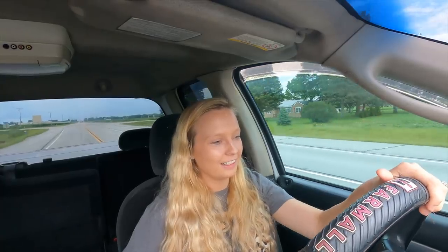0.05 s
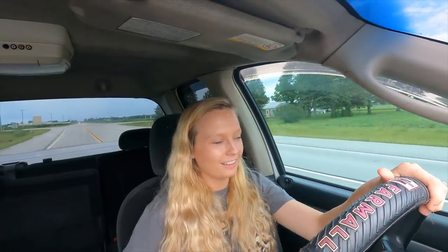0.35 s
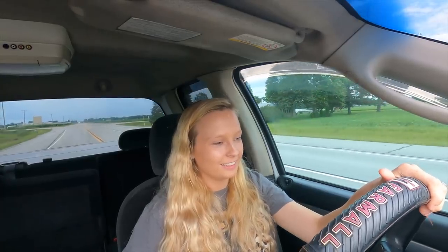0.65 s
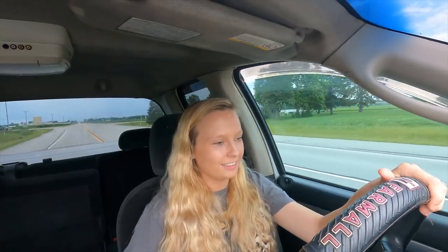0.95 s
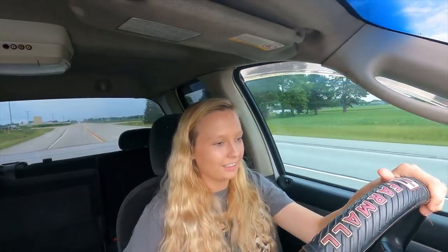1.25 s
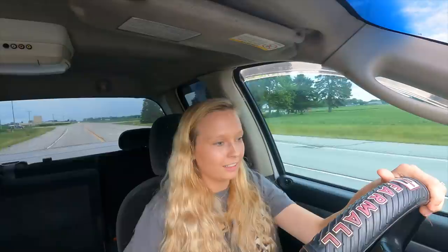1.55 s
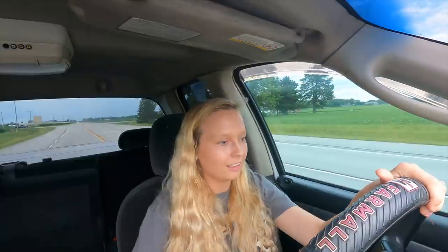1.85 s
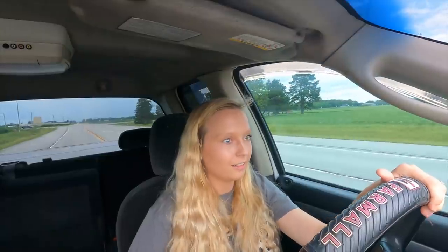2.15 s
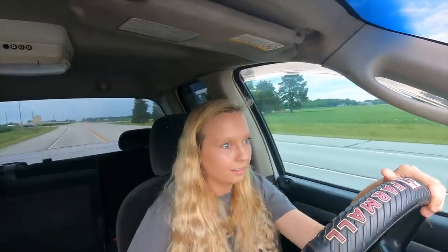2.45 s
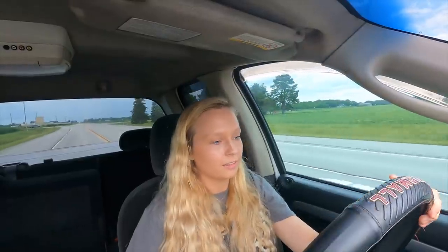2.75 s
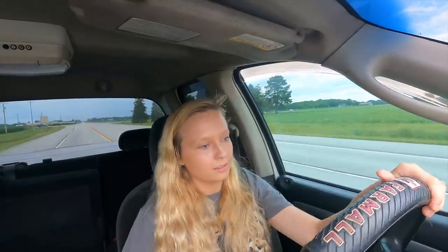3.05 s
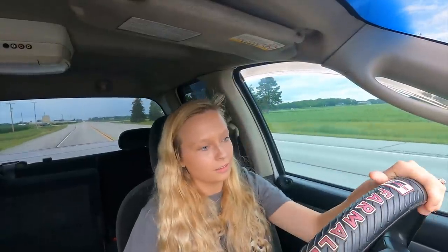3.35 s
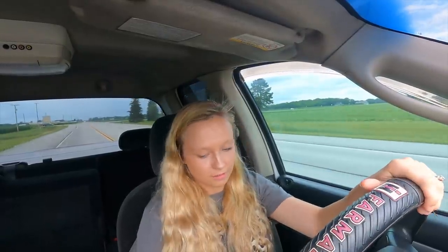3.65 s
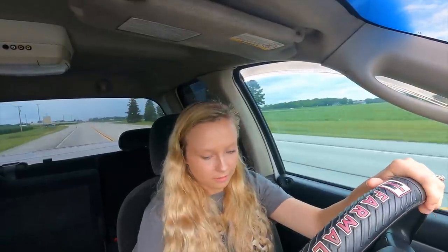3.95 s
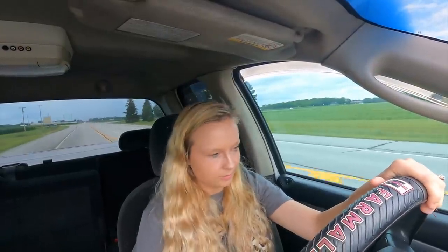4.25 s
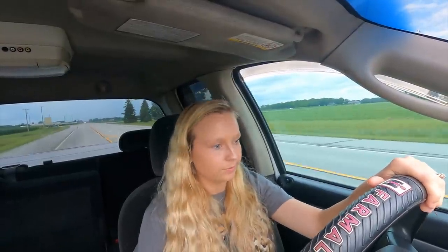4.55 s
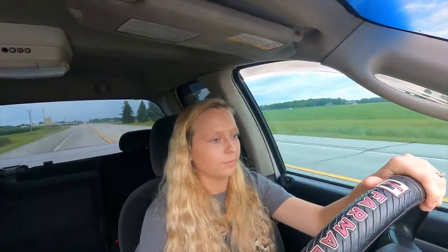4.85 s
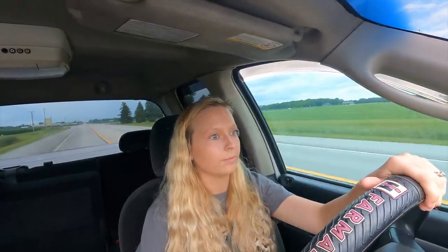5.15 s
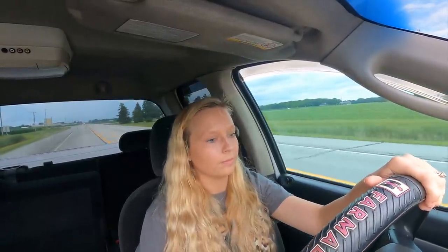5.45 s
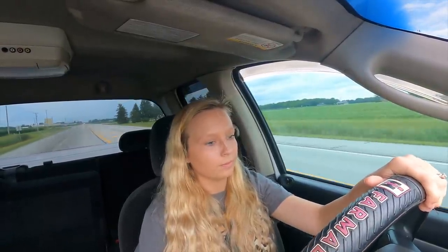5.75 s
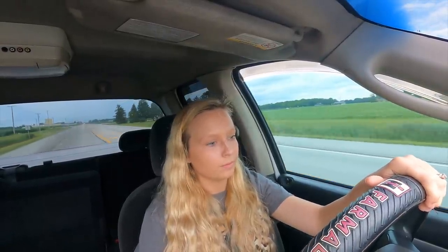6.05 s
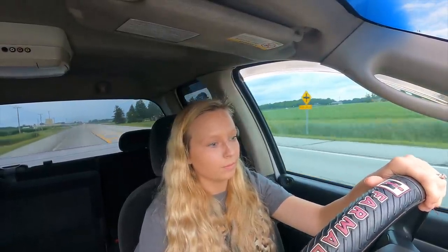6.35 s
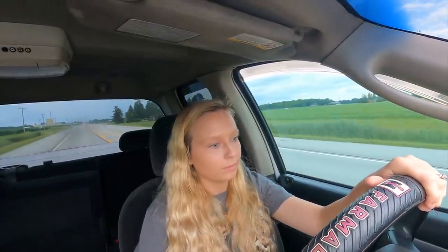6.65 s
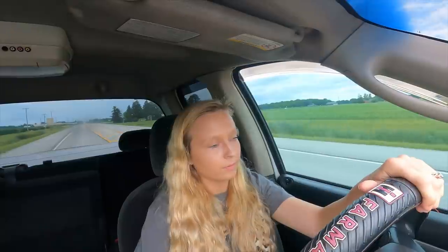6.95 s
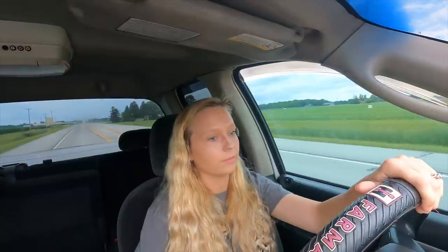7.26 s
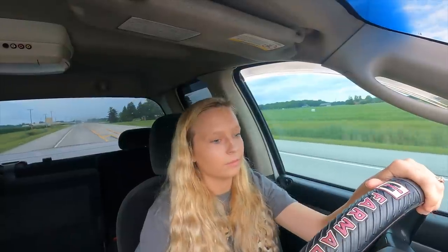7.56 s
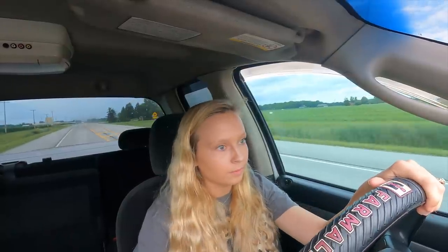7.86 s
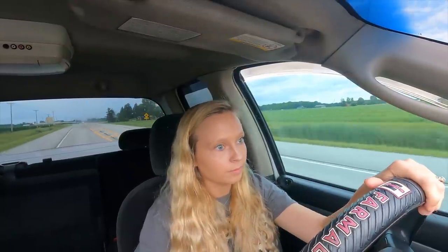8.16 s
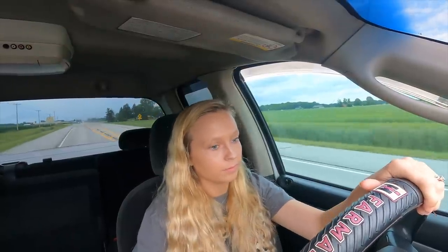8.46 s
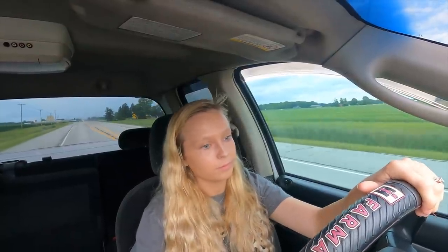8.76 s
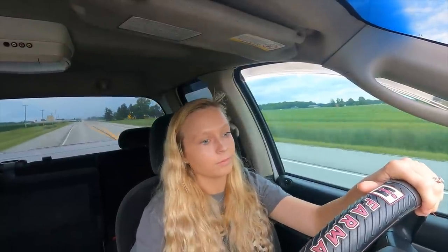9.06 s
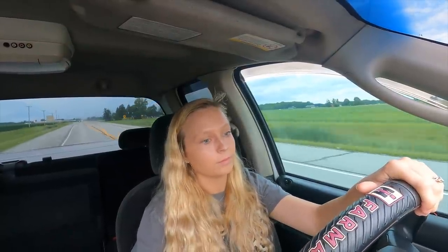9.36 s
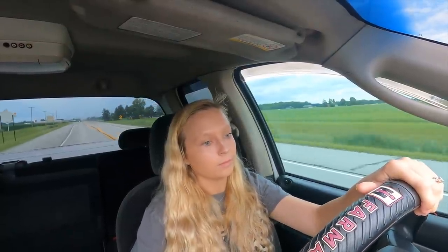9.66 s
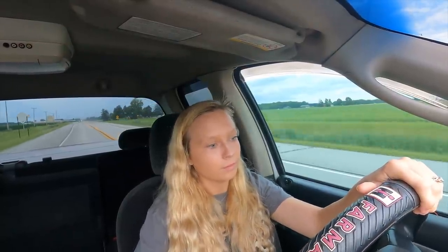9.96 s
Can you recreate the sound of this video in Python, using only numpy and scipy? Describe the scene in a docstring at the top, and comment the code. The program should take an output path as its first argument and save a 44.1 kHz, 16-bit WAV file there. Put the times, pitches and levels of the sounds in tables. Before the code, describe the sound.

Inside a truck cab, a diesel engine drones and pulls through two gear changes, with road rumble, a faint whistle and plastic trim snaps.

```python
"""Inside the cab of a six-cylinder diesel pickup that pulls away through two upshifts.
The periodic firing of the cylinders drives the cab's resonances, so its note booms; unequal cylinders
shake the cab when the engine lugs after a shift. Combustion clatters through the bulkhead, the turbo
whistles faintly over its intake hiss, tyres rumble, and plastic trim snaps and squeaks now and then."""
import sys
import numpy as np
from scipy import signal
from scipy.fft import rfft, irfft
from scipy.io import wavfile
from scipy.ndimage import uniform_filter1d

SR = 44100
rng = np.random.default_rng(int(sys.argv[2]) if len(sys.argv) > 2 else 0)


def file_out(sig):
    """Save sig as 16-bit WAV at sys.argv[1]."""
    # one column per channel
    cols = np.atleast_2d(sig).T
    # limit, then scale
    lim = np.clip(cols, -1, 1)
    pcm = np.round(lim * 32767).astype(np.int16)
    wavfile.write(sys.argv[1], SR, pcm)


N = 441000
TIME = np.arange(N) / SR
BINS = np.fft.rfftfreq(N, 1 / SR)
CYLINDERS, EDGE_HZ = 6, 15700
BOOM_HZ, BOOM_WIDTH_HZ, BOOM_DB = 126, 26.4, -12  # the cab's boom


def amp(db):
    """Decibels to amplitude ratio."""
    return 10 ** (np.asarray(db) / 20)


def unit(x):
    """Normalisation to an rms of one."""
    return x / np.sqrt(np.mean(x ** 2) + 1e-20)


def curves(rows):
    """Linear interpolation of each column of a time table."""
    times, *columns = np.transpose(rows)
    return [np.interp(TIME, times, column) for column in columns]


def spectrum(points):
    """Linear interpolation on a log-frequency axis."""
    hz, value = np.transpose(points)
    return np.interp(np.log(BINS + 1), np.log(hz), value)


def wander(rate_hz):
    """Random modulation of rms one, low-passed at about the given rate."""
    coarse = np.linspace(0, TIME[-1], 4000)
    hz = np.fft.rfftfreq(len(coarse), coarse[1])
    slow = irfft(rfft(rng.standard_normal(len(coarse))) * np.exp(-(hz / rate_hz) ** 2))
    return np.interp(TIME, coarse, unit(slow))


def step(x):
    """Logistic rise from 0 to 1 as x passes zero."""
    return .5 + .5 * np.tanh(x / 2)


def resonance(hz, centre_hz, width_hz):
    """Lorentzian curve: one at the centre, a half at the edges of the width."""
    return 1 / (1 + ((hz - centre_hz) / (width_hz / 2)) ** 2)


def pan(left_db):
    """Level panning: gains that set the left channel this far above the right."""
    return amp(np.array([[left_db], [-left_db]]) / 2)


# Likeness of left and right: (frequency [Hz], correlation [0-1])
COHERENCE = [(30, 1), (70, .98), (130, .95), (250, .72), (500, .84), (1000, .82), (2000, .42), (4000, .66),
             (8000, .64), (14000, .56)]
def noise(colour):
    """Partial coherence: coloured stereo noise, alike in the bass and looser in the treble."""
    mid, side = rfft(rng.standard_normal((2, N)))
    alike = np.clip(spectrum(COHERENCE), 0, 1)
    mid, side = mid * np.sqrt(1 + alike), side * np.sqrt(1 - alike)
    return unit(irfft(np.array([mid + side, mid - side]) * amp(spectrum(colour)), N))


def reflections(x, echo_db, span_s):
    """Comb filtering: echoes from nearby glass and panels ripple the spectrum."""
    taps = np.zeros((2, 2048))
    delays = rng.integers(40, int(np.clip(span_s * SR, 100, 2000)), 24)
    taps[:, delays] = rng.standard_normal(len(delays)) + .5 * rng.standard_normal((2, len(delays)))
    taps *= amp(echo_db) / np.linalg.norm(taps, axis=1, keepdims=True)
    taps[:, 0] = 1  # direct sound
    return signal.oaconvolve(x, taps / np.linalg.norm(taps[0]), axes=1)[:, :N]


# Engine speed: (time [s], firing rate [Hz])
ENGINE_SPEED = [(0, 118.5), (0.5, 123.1), (1.0, 125.3), (1.5, 128.4), (1.98, 130.8), (2.12, 138),
                (2.39, 140.4), (2.56, 101), (3.5, 109.1), (5.0, 120.5), (6.0, 126), (7.08, 130.7),
                (7.28, 120.7), (7.95, 120.1), (8.08, 123.7), (8.3, 121.2), (9.0, 122.7), (10, 133)]
def firing_rate():
    """The engine's fundamental in Hz, one period to each firing."""
    return curves(ENGINE_SPEED)[0]


def lugging(below_hz=118.7, spread_hz=2.6):
    """Soft threshold: how much the engine labours at low speed, 0-1."""
    return step((below_hz - firing_rate()) / spread_hz)


# Upshifts: (start [s], length [s], dip of the firing note [dB], surge as the gear bites [dB],
# body shudder [dB])
UPSHIFTS = [(2.076, 0.45, -1, 0.3, -22.5), (7.5, 0.45, -3.5, 2, -37)]
def shifting(start, length, edge_s=0.035):
    """Smooth gate: one during a gear change, zero outside it."""
    return step((TIME - start) / edge_s) * step((start + length - TIME) / edge_s)


# The gears in turn: (rocking [dB], clatter [dB], second harmonic [dB], third harmonic [dB])
GEAR_LEVELS = [(-38.5, -43.5, 2, -4.5), (-31, -42.5, 0, 0.54), (-34.5, -41.5, -1, -1)]
def in_gear():
    """Crossfade of levels: each shift hands over to the next gear."""
    gear = sum(np.clip((TIME - start) / length, 0, 1) for start, length, *_ in UPSHIFTS)
    return [np.interp(gear, np.arange(len(column)), column) for column in np.transpose(GEAR_LEVELS)]


# Spectra of the tyres and of the body: (frequency [Hz], relative density [dB])
TYRE_SPECTRUM = [(20, -23), (45, -4.5), (70, 1.5), (95, -2.5), (130, 1), (180, 3), (240, -1), (300, -3),
                 (370, -3), (450, -7.5), (560, -10.5), (660, -10), (820, -21.5), (1400, -52), (8000, -100)]
BODY_SPECTRUM = [(10, -9.5), (25, -1), (42, 6.5), (60, -3), (85, -7.5), (130, -19), (300, -67.5),
                 (2000, -110)]
def road(rise_db_per_s=0.3727, shift_rumble_db=1):
    """Low-frequency noise: tyre rumble grows; in a shift the drive line and body shake harder."""
    rumble_db = -29.5 + rise_db_per_s * TIME
    tremble = amp(-33.5)
    for start, length, _, _, shudder_db in UPSHIFTS:
        rumble_db += shift_rumble_db * shifting(start, length)
        tremble = tremble + amp(shudder_db) * shifting(start, length)
    return amp(rumble_db) * noise(TYRE_SPECTRUM) + tremble * noise(BODY_SPECTRUM).mean(0)


# Blade tone of the turbo: (time [s], frequency [Hz])
BLADE_TONE = [(0, 7440), (1.1, 7550), (2.1, 7430), (2.45, 6720), (2.75, 6600), (3.3, 7330), (4, 8700),
              (4.7, 9440), (5.5, 9750), (6.5, 9080), (7.3, 8660), (7.75, 6800), (8.05, 6200), (8.35, 6700),
              (9.1, 8480), (10, 9970)]
def turbo_speed(middle_hz=8000):
    """Pitch follows rotor speed: the blade tone in Hz, and in octaves above its middle pitch."""
    whistle_hz, = curves(BLADE_TONE)
    return whistle_hz, np.log2(whistle_hz / middle_hz)


# Spectrum of the intake air: (frequency [Hz], relative density [dB])
INTAKE_SPECTRUM = [(100, -47), (1200, -25.5), (2500, 4), (3700, 0), (4700, 0.5), (6000, -3), (7700, -4.5),
                   (8200, -2), (9000, -1.5), (10600, -0.5), (11400, -7.5), (12600, -6), (14000, -18),
                   (16000, -29)]
# Swell of both hiss and clatter: (time [s], gain [dB])
ENGINE_SWELL = [(0, 2.5), (0.7, -1), (2.2, -0.6), (3.3, 1.3), (4.5, 2.2), (5.6, 0.2), (8.6, 0.26),
                (10, 0.5)]
def intake(db_per_octave=2.5, lug_db=1):
    """Broadband flow noise: the intake hiss grows and brightens as the turbo spins up."""
    swell_db, = curves(ENGINE_SWELL)
    _, octaves = turbo_speed()
    hiss_db = -48.5 + swell_db + db_per_octave * octaves + lug_db * lugging()
    hiss = noise(INTAKE_SPECTRUM)
    treble = irfft(rfft(hiss) / (1 + (7900 / (BINS + 1)) ** 24), N)
    opening = amp(-12 + 7.5 * octaves)
    return amp(hiss_db) * (hiss - treble + opening * treble) * pan(left_db=1.4)


def air_band(centre_hz, width_hz):
    """Quadrature modulation: a band of rushing air follows a moving pitch."""
    baseband = noise([(1, 0), (width_hz / 2, -2), (width_hz, -10),
                      (4 * width_hz, -42), (8 * width_hz, -90)])
    quadrature = np.roll(baseband, N // 2, axis=1)
    angle = 2 * np.pi * np.cumsum(centre_hz) / SR
    return baseband * np.cos(angle) + quadrature * np.sin(angle)


def turbo_rush(db_per_octave=-6, spool_db=3, spool_hz_per_s=1000, lug_db=4.5):
    """Narrowband flow noise just below the whistle, louder while the turbo gains or loses speed."""
    whistle_hz, octaves = turbo_speed()
    glide = uniform_filter1d(abs(np.gradient(whistle_hz, TIME)), size=SR // 4)
    spooling = np.tanh(glide / spool_hz_per_s)
    duct_db = 6 * resonance(whistle_hz, centre_hz=7880, width_hz=470)
    rush_db = -63.5 + db_per_octave * octaves + spool_db * spooling + lug_db * lugging() + duct_db
    upper = amp(-0.5) * air_band(whistle_hz - 60, width_hz=320)
    lower = amp(-5) * air_band(whistle_hz * .93, width_hz=580)
    rush = (upper + lower) * amp(rush_db + 2.2 * wander(rate_hz=41))
    return reflections(rush, echo_db=0.5, span_s=.015)


def turbo_whistle(cycles, db_per_octave=-5.5):
    """Blade tone, phase-modulated at half the firing rate and lifted at the intake duct's resonance."""
    whistle_hz, octaves = turbo_speed()
    duct_db = 8.5 * resonance(whistle_hz, centre_hz=7540, width_hz=90)
    sway = .6 * np.sin(np.pi * CYLINDERS * cycles)
    angle = 2 * np.pi * np.cumsum(whistle_hz + 3 * wander(rate_hz=10)) / SR + sway
    # the gliding tone crosses standing waves in the cab, differently on each side
    sides = [amp(3.5 * wander(rate_hz=10)) * np.sin(angle + .4 * wander(rate_hz=4)) for _ in range(2)]
    return np.sqrt(2) * amp(-64 + db_per_octave * octaves + duct_db) * np.array(sides)


# Spectrum of combustion knock: (frequency [Hz], relative density [dB])
KNOCK_SPECTRUM = [(300, -29), (600, -10), (950, 2.5), (1280, 1), (1480, -4.5), (1800, -2), (2200, -10),
                  (2700, -12), (3600, -18.5), (5000, -29), (10000, -51), (16000, -92.5)]
def clatter(cycles, db_per_octave=3, lug_db=0.2):
    """Amplitude-modulated noise: combustion knock swells with every firing, unevenly by cylinder."""
    _, gear_db, *_ = in_gear()
    swell_db, = curves(ENGINE_SWELL)
    _, turbo_octaves = turbo_speed()
    clatter_db = gear_db + swell_db + db_per_octave * turbo_octaves + lug_db * lugging()
    knocks = sum(np.cos(2 * np.pi * (k * cycles + rng.random())) for k in range(2, CYLINDERS + 1))
    envelope = amp(clatter_db + 0.16 * wander(rate_hz=46)) * unit(1 + 0.034 * knocks)
    return envelope * noise(KNOCK_SPECTRUM) * pan(left_db=1.4)


# Rubbing trim: (time [s], frequency [Hz], level [dB])
TRIM_RUBS = [(2.645, 5520, -53), (2.69, 5450, -57), (2.75, 5470, -57), (2.8, 5490, -53)]
def trim_squeaks(half_width_s=0.013):
    """Friction tones: panels rub for a moment as the lugging engine shakes them."""
    out = np.zeros(N)
    for time, hz, db in TRIM_RUBS:
        envelope = amp(db) * np.exp(-((TIME - time) / half_width_s) ** 2)
        out += envelope * np.sin(2 * np.pi * hz * TIME + 1.5 * wander(rate_hz=120))
    return np.sqrt(2) * out


# Modes of the trim: (base frequency [Hz], relative energy [dB], t60 [s])
PANEL_MODES = [(1055, -14, 0.032), (1250, 2, .03), (1703, 12.5, 0.06), (1890, 0, .035), (2174, 4, 0.027),
               (2520, -0.5, 0.039), (3560, 6, 0.0093), (4460, -5, 0.02), (5190, -3, 0.04), (6300, -4, 0.04),
               (7480, -20, 0.035), (9200, -21.5, 0.029), (10200, -14, .025)]
def panel_ring(t, pitch):
    """Impulse response of a panel: a sum of damped modes, scaled to unit energy."""
    ring = sum(amp(db - 60 * t / t60) * np.sin(2 * np.pi * hz * pitch * t) / np.sqrt(t60)
               for hz, db, t60 in PANEL_MODES if hz * pitch < EDGE_HZ)
    return ring / np.linalg.norm(ring)


# Spectrum of a snap: (frequency [Hz], relative density [dB])
SNAP_SPECTRUM = [(100, -50), (600, -16), (1200, -4), (2000, -6), (2800, -7), (5000, -3), (7000, -4),
                 (8800, -4), (9600, -10), (12000, -11), (14000, -22), (16000, -36)]
# Snaps of the trim: (time [s], level [dB], t60 [s], panel pitch [ratio], ring [dB], treble [dB])
SNAP_EVENTS = [(1.67, -33, 0.037, 0.93, -2, -9), (1.6722, -25, 0.069, 1, 0, -16),
               (1.719, -36.5, 0.089, 1, 3, -16), (1.7332, -27.5, 0.069, 0.98, 0, -21),
               (1.746, -34.5, .06, 1.3, 1.5, -18), (2.1536, -17, 0.045, 0.99, -6, -3.5),
               (2.16, -27.5, 0.091, 1.1, 2, -5), (6.8315, -37, 0.049, 1, -1, -7),
               (6.877, -21.5, 0.051, 0.96, -2.5, -2), (9.87, -32, 0.031, 2.85, -7, -2)]
def trim_snaps(rise_s=0.0003):
    """Transient excitation: stressed plastic lets go in gritty bursts that ring the panel."""
    t = TIME[:SR // 4]
    crack = noise(SNAP_SPECTRUM)
    treble = irfft(rfft(crack) / (1 + (8500 / (BINS + 1)) ** 6), N)
    grit = noise([(100, 0), (16000, 0)])
    crackle = amp(1.8 * wander(rate_hz=180))
    out = np.zeros((2, N))
    for time, db, t60, pitch, ring_db, treble_db in SNAP_EVENTS:
        span = slice(round(time * SR), round(time * SR) + len(t))
        age = t[:len(TIME[span])]
        envelope = amp(db - 60 * age / t60) * (1 - np.exp(-age / rise_s)) * crackle[span]
        ring = signal.fftconvolve(envelope * grit[:, span], panel_ring(t, pitch)[None], axes=1)
        burst = crack[:, span] + (amp(treble_db) - 1) * treble[:, span]
        out[:, span] += amp(-2) * envelope * burst + amp(ring_db) * ring[:, :len(age)]
    return out * pan(left_db=1)


# Orders of the uneven cylinders: (frequency [multiple of the cycle rate], level re shudder [dB])
LOPE_ORDERS = [(2, -19), (4, -0.5), (5, -11.5), (7, -9.5), (8, -10.5), (9, -6.5), (10, -14.5), (11, -22.5),
               (13, -25.5), (14, -25.5), (15, -17.5), (16, -20.5), (17, -24), (19, -24.5), (21, -26.5)]
def lope(cycles, firing_hz, rock_db_per_hz=0.74, lug_rock_db=15, lug_shudder_db=16):
    """Harmonics of the four-stroke cycle: unequal cylinders make the note throb, most when lugging."""
    gear_db, *_ = in_gear()
    rock_db = gear_db + lug_rock_db * lugging() + rock_db_per_hz * (firing_hz - BOOM_HZ)
    shudder_db = -39 + lug_shudder_db * lugging()
    angle = 2 * np.pi * cycles
    out = amp(rock_db + 1.7 * wander(rate_hz=14)) * np.sin(CYLINDERS / 2 * angle)  # half the firing rate
    for k, db in LOPE_ORDERS:
        level = amp(shudder_db + db + 0.91 * wander(rate_hz=3.3))
        out += level * np.sin(k * angle + 2 * np.pi * rng.random() + 0.42 * wander(rate_hz=4.4))
    return np.sqrt(2) * out


# Resonances of the cab: (frequency [Hz], width [Hz], level [dB])
CAB_MODES = [(215.2, 20, -26), (247.5, 10.2, -30), (267.7, 11, -27.5), (329.5, 16, -30), (354, 34.4, -29.5),
             (392.9, 8, -42.5), (458.6, 14, -32), (502, 12, -41.5), (568.5, 25, -41.5), (629.3, 38, -41.5),
             (720, 91, -49)]
def cab_gain(hz, base_db=-39):
    """Frequency response of the cab: its modes add in power over a falling base."""
    grid = np.geomspace(100, 2000, 1500)
    power = sum((amp(db) * resonance(grid, centre, width)) ** 2 for centre, width, db in CAB_MODES)
    base = amp(base_db) * (250 / grid) ** 2.28
    return np.interp(hz, grid, np.sqrt(power + base ** 2))


# How hard the engine pulls: (time [s], load [dB])
ENGINE_LOAD = [(0, 0.7), (0.5, 0.4), (1.6, -0.27), (3.5, -0.16), (5.2, 0.92), (6.4, -0.5), (7.1, -0.18),
               (8.6, -0.74), (10, 1.5)]
def firing(cycles, firing_hz, growl_per_load=2.3, bite_delay_s=0.135, bite_s=0.07):
    """Forced resonance: the firing note swells near the boom; its overtones sweep the cab's modes."""
    load_db, = curves(ENGINE_LOAD)
    _, _, second_db, third_db = in_gear()
    shift_db = np.zeros(N)
    for start, length, dip_db, surge_db, _ in UPSHIFTS:
        bite = np.exp(-((TIME - start - length - bite_delay_s) / bite_s) ** 2)
        shift_db += dip_db * shifting(start, length) + surge_db * bite
    boom = amp(BOOM_DB + load_db + shift_db) * np.sqrt(resonance(firing_hz, BOOM_HZ, BOOM_WIDTH_HZ))
    angle = 2 * np.pi * CYLINDERS * cycles
    note = boom * amp(0.11 * wander(rate_hz=84)) * np.sin(angle)
    sharpness = amp(growl_per_load * load_db + 1.1 * shift_db)  # load sharpens the exhaust pulses
    overtones = np.zeros(N)
    for k in range(2, 11):
        order_db = second_db * (k == 2) + third_db * (k == 3) - 2 * (k > 5)
        level = sharpness * cab_gain(k * firing_hz) * amp(order_db + 0.99 * wander(rate_hz=6.4))
        overtones += level * np.sin(k * angle + 2 * np.pi * rng.random() + 0.11 * wander(rate_hz=8.8))
    return np.sqrt(2) * (note * pan(left_db=-.2) + overtones)


def scene():
    """Superposition of the sources; one crankshaft keeps the engine's rhythms in step."""
    firing_hz = firing_rate()
    cycles = np.cumsum(firing_hz) / SR / CYLINDERS  # four-stroke cycles completed
    bulkhead = reflections(clatter(cycles) + intake(), echo_db=-8.5, span_s=.025)
    engine = firing(cycles, firing_hz) + lope(cycles, firing_hz)
    rumble = road()
    turbo = (turbo_whistle(cycles) + turbo_rush()) * pan(left_db=3.5)
    return rumble + bulkhead + turbo + trim_snaps() + trim_squeaks() + engine


def record(dry):
    """Band limiting: a linear-phase low-pass removes the highest treble."""
    low_pass = signal.firwin(511, EDGE_HZ, window=("kaiser", 9), fs=SR)
    return signal.oaconvolve(dry, low_pass[None], "same")


dry = scene()
out = record(dry)
file_out(out)
```